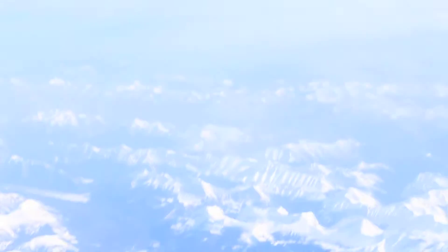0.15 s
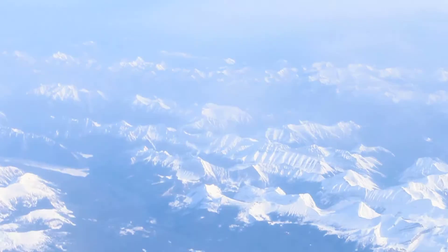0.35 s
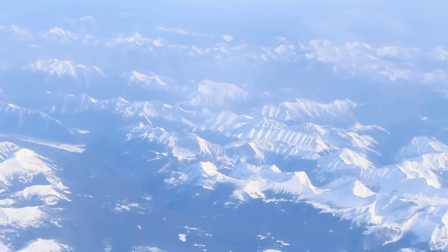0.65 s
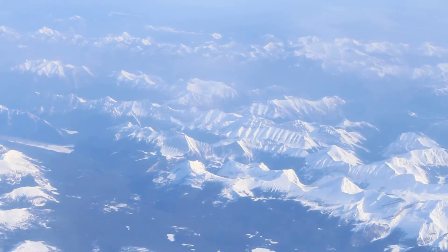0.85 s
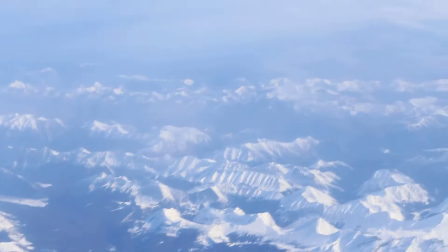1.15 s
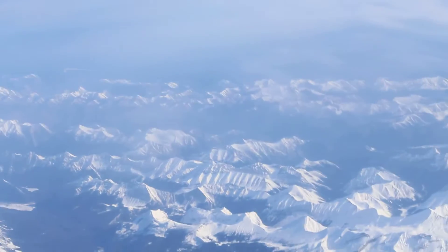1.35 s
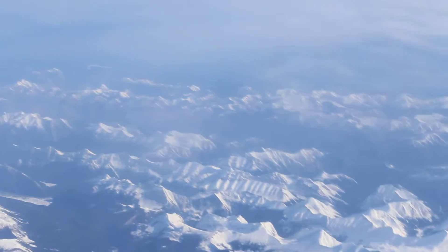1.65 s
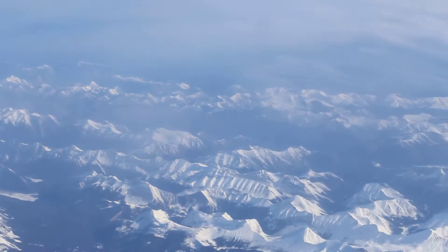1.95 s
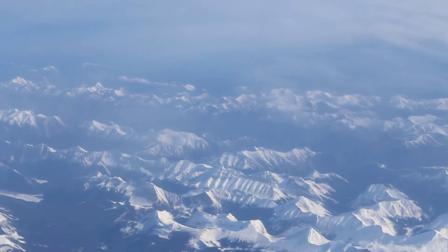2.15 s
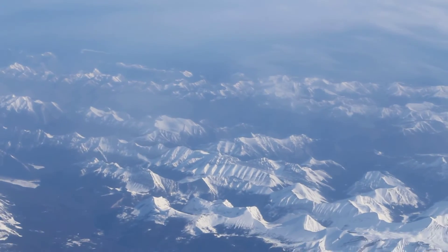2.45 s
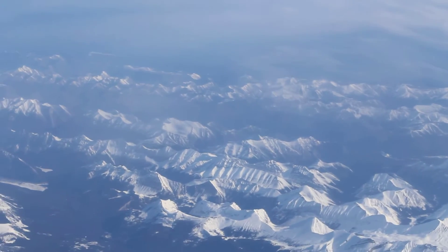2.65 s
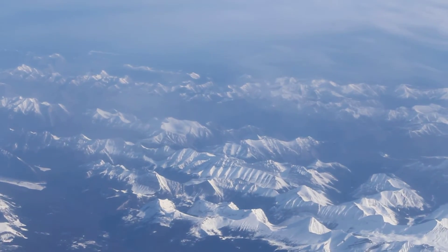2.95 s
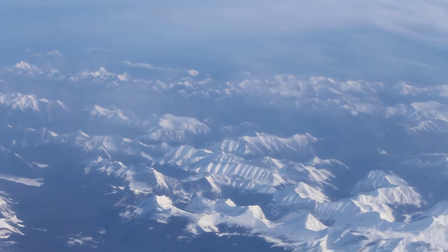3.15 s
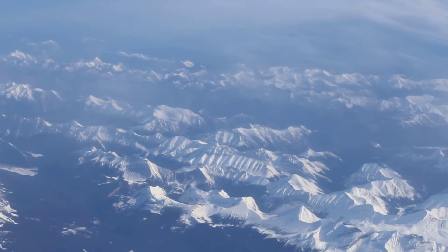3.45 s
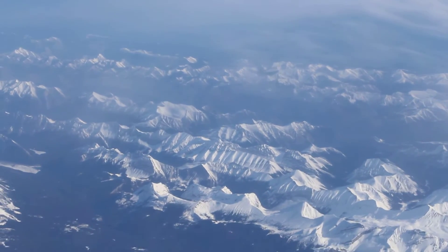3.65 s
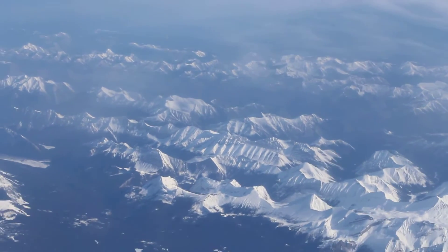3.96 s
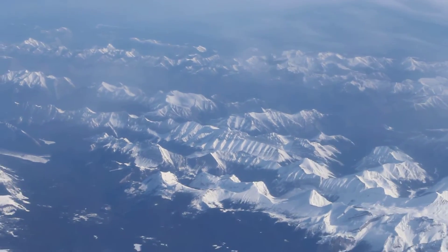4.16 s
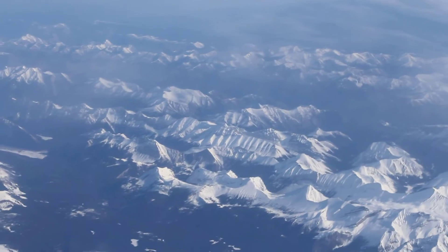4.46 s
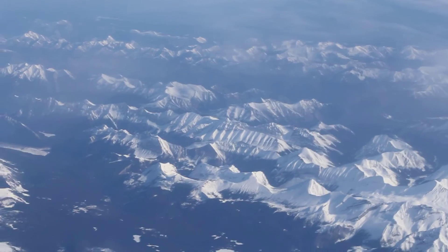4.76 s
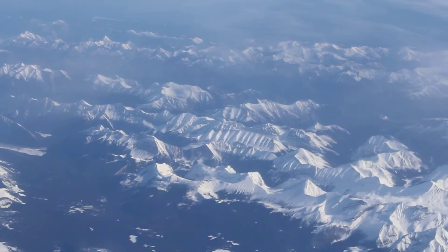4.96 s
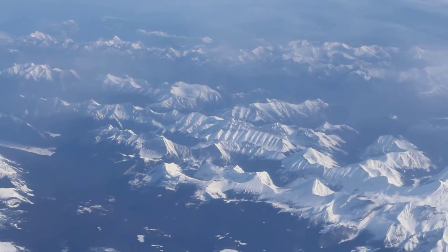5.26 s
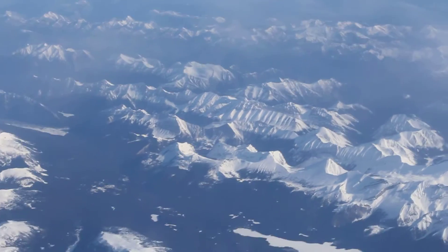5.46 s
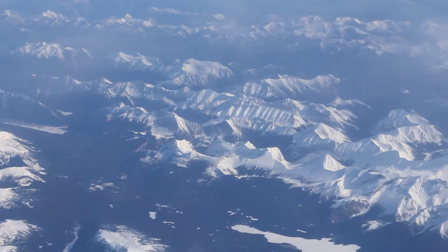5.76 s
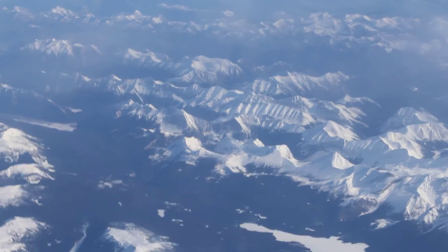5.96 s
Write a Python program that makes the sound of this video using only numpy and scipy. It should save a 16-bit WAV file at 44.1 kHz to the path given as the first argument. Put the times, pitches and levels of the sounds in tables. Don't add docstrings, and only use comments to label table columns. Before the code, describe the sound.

Broadband cabin noise, boomy and muffled by the wall panels, runs without pause from start to end. It starts a little louder, then holds nearly level with short thumping surges. Very close to the microphone, dry skin scrapes and small plastic ticks come and go, a finger briefly dulls the sound, and a double knock closes it.

```python
import sys
import numpy as np
from scipy import signal
from scipy.fft import rfft, irfft
from scipy.io import wavfile
from scipy.ndimage import uniform_filter1d

SR = 44100
rng = np.random.default_rng(int(sys.argv[2]) if len(sys.argv) > 2 else 0)


def inscribe(sig):
    pcm = np.round(np.clip(np.atleast_2d(sig).T, -1, 1) * 32767)
    wavfile.write(sys.argv[1], SR, pcm.astype(np.int16))


def ratio(d):
    e = np.asarray(d, float) / 20
    return 10 ** e


N = 268993


def evened(x):
    return x / np.sqrt(np.mean(x ** 2) + 1e-20)


def drifting(shape, span, axis=-1):
    return evened(uniform_filter1d(rng.standard_normal(shape), size=span, axis=axis))


def read(points, hz):
    f, value = np.transpose(points)
    return np.interp(np.log(hz + 1), np.log(f + 1), value)


def add(mix, s, sound):
    part = mix[round(s * SR):][:len(sound)]
    part += sound[:len(part)]


def colour(x, db_of):
    return irfft(rfft(x) * ratio(db_of(np.fft.rfftfreq(len(x), 1 / SR))), len(x))


def resonate(x, hz, width):
    turn = np.exp(2j * np.pi * np.cumsum(hz * np.ones(len(x))) / SR)
    r = np.exp(-np.pi * width / SR)
    once = signal.lfilter([1 - r], [1, -r], x / turn)
    twice = signal.lfilter([1 - r], [1, -r], once)
    return 2 * (turn * twice).real


def roar():
    # t/s, level/dB
    airflow = [(0, 2.5), (.4, 0.5), (.7, 0), (1, 1), (1.5, -0.5), (1.95, .5), (2.25, -1.5), (2.5, -0.5),
               (3.6, 0), (4.4, 0), (5.1, 0.2), (5.7, .5), (6.1, -1.5)]
    # f/Hz, level/dB
    vent_spectrum = [(1000, 17.5), (2500, -3), (3500, -0.5), (5800, -7.5), (6400, -12), (8000, -13),
                     (9000, -17.5), (12000, -19.5), (15600, -18), (16000, -13.5)]
    hz, frames = np.fft.rfftfreq(2048, 1 / SR), N // 512 + 5

    upper = 1 / (1 + (430 / (hz + 1)) ** 4)
    colours = ratio(cabin_db(hz)) * np.sqrt([1 - upper, upper])
    colours /= np.linalg.norm(colours[0])
    vent = ratio(read(vent_spectrum, hz)) / np.sqrt(1 + (2400 / (hz + 1)) ** 4)
    colours = np.vstack([colours, vent / np.linalg.norm(vent)])

    patches = rng.standard_normal((frames, len(hz))).T
    patches = uniform_filter1d(patches, size=20, axis=0)
    patches = evened(uniform_filter1d(patches, size=8, axis=1))
    a, b = rng.standard_normal((frames, len(hz), 2)).T
    field = (a + 1j * b) * ratio(1.05 * patches) * colours[:, :, None]
    boom, rush, hiss = signal.istft(field, nperseg=2048, noverlap=1536)[1][:, :N]

    t = np.arange(N) / SR
    swell_db = np.interp(t, *np.transpose(airflow))
    surge_db, sag_db = buffeting(t)
    boom_db = -16.5 + swell_db + surge_db + sag_db
    rush_db = -15.5 + 1.2 * swell_db + 0.8 * sag_db
    hiss_db = -46.5 + 1.8 * swell_db + 0.3 * surge_db + 0.4 * sag_db
    flicker_db = drifting(N, 1500)
    air = ratio(boom_db) * boom + ratio(rush_db) * rush + ratio(hiss_db + flicker_db) * hiss
    return air / np.std(boom)


def cabin_db(hz):
    # f/Hz, level/dB
    wall = [(15, -60.5), (25, -15), (102, -14.5), (144, 0.5), (185, -2), (216, -5.5), (278, -0.5),
            (441, -14.5), (578, -12.5), (674, -18), (757, -17.5), (2500, -46), (3250, -61.5), (5500, -120)]
    # f/Hz, width/Hz, lift/dB
    resonances = [(60, 8.3, -4), (95, 13, 3.5), (150.7, 45, 3.5), (247.5, 77, 2.5), (330, 58, 4),
                  (523, 67, 0.5), (573, 27, 2.5), (754, 55, 3.5), (1100, 180, 3.5), (1426, 55, 5.5)]
    lift_db = sum(db / (1 + (2 * (hz - f) / width) ** 2) for f, width, db in resonances)
    return read(wall, hz) + lift_db


def buffeting(t):
    # t/s, surge/dB, sag/dB
    gusts = [
        (0.002, 6, -3.5),
        (0.17, 1, -4.5),
        (1.381, 7.5, 2),
        (1.63, 13, -5),
        (4.47, 3, -1),
        (4.569, 10, -2),
        (4.885, 9.5, -4),
    ]
    s, surge_db, sag_db = np.transpose(gusts)[:, :, None]
    surge = surge_db * np.exp(-((t - s) / 0.013) ** 2)
    sag = sag_db * np.exp(-((t - s - 0.045) / 0.051) ** 2)
    return surge.sum(0), sag.sum(0)


def hand():
    # start t/s, length/s, peak level/dB, place of peak (0-1), top of the hiss level/dB
    swipes = [(.87, 0.27, -35.5, 0.22, -18), (1.887, 0.18, -33, 0.17, -17), (4.936, 0.26, -35.5, .5, -22),
              (5.185, .05, -41, 0.3, -28), (5.86, 0.2, -44, 0.4, -11)]
    drags = [(1.2, .25, -33.5, 0.96, -16.5), (1.435, .28, -37.5, .2, -12), (1.7, 0.14, -36.5, 1, -15.5),
             (5.255, .21, -43.5, .25, -22), (5.439, 0.18, -37.5, 0.4, -24), (5.6, 0.26, -41.5, .25, -21)]
    # t/s, peak level/dB, ring f/Hz, hiss length/s, tilt/dB per octave
    ticks = [(1.413, -28.5, 3460, .014, -4), (3.660, -20, 3040, 0.0077, -10), (3.885, -43, 4670, .009, -2),
             (3.886, -39, 6100, .006, 1), (4.102, -46, 8600, .004, 2), (6.06, -19.5, 3080, 0.0043, -1),
             (6.084, -19.5, 3170, 0.0086, -9.5)]
    # t/s, peak level/dB, hiss length/s, tilt/dB per octave
    cracks = [(0.976, -26.5, .011, -6), (1.58, -37, .01, 2), (2.708, -47, 0.053, -1.5),
              (3.674, -37, .0052, -3), (4.352, -46, .044, 1), (5.247, -28, .0074, -3),
              (6.063, -22, 0.0051, -1.5), (6.066, -19.5, 0.012, -14)]
    # t/s, peak level/dB, f/Hz, length/s
    knocks = [
        (6.056, -4.5, 330, 0.015),
        (6.085, -11, 413, 0.0087),
    ]
    # t/s, length/s, from f/Hz, to f/Hz, level/dB
    squeaks = [
        (3.226, .09, 7200, 7800, -53),
        (3.855, .022, 13700, 13350, -44),
        (3.876, 0.021, 10680, 10680, -47),
        (3.895, .02, 10680, 10680, -62),
    ]
    out = np.zeros(N)
    for row in swipes:
        add(out, row[0], stroke(*row, ring=0.15, rise_db=10.5, fall_db=12.5))
    for row in drags:
        add(out, row[0], stroke(*row, ring=0.72, rise_db=3, fall_db=4))
    for s, peak_db, hz, length, tilt_db in ticks:
        add(out, s, tick(peak_db, hz, length, 0.28, tilt_db))
    for s, peak_db, length, tilt_db in cracks:
        add(out, s, tick(peak_db, 0, length, 0, tilt_db))
    for s, *rest in knocks:
        add(out, s, knock(*rest))
    for s, length, *rest in squeaks:
        add(out, s, squeak(length, *rest, waver=4 * length ** 2))
    return out


def stroke(start, length, peak_db, place, top_db, ring, rise_db, fall_db):
    # f/Hz, level/dB
    rub_low = [(700, -7), (1500, 6), (3000, -4.5), (5500, -2.5), (7500, -19), (10000, -25)]
    rub_top = [(5500, -18), (7500, 2), (10000, -7), (12500, -5), (14500, -13), (16000, -12)]
    # f/Hz, width/Hz, level/dB
    first_hold = [(1290, 400, 4), (2230, 170, -3), (3210, 270, -4), (3610, 380, 1), (4370, 120, -10),
                  (4810, 160, -4), (5530, 250, -17)]
    finger_moved = [(1300, 440, 5.5), (2150, 250, -1.5), (3400, 340, -7), (3850, 190, 1), (4390, 200, -6),
                    (4910, 200, -5), (5600, 210, -18), (6500, 400, -13)]
    late_hold = [(2570, 300, -12), (3250, 400, -8), (3780, 340, 0), (4480, 260, -5), (5000, 400, -12),
                 (5550, 600, -10)]
    # f/Hz, width/Hz, level/dB
    air_gap = [(7250, 800, -1), (8100, 500, -8), (9100, 500, -7), (10900, 700, -9), (12200, 1200, 0),
               (13400, 1500, 0), (14400, 1200, -2), (15400, 700, -5)]
    moved_s, regrip_s = 1.43, 3
    casing = first_hold if start < moved_s else finger_moved if start < regrip_s else late_hold
    sliding_from_s = 1.17 if start < regrip_s else 5.17

    t = np.arange(0, length, 1 / SR)
    press_db = np.interp(t / length, [0, np.clip(place, .01, .99), 1], [-rise_db, 0, -fall_db])
    slid = np.maximum(t + start - sliding_from_s, 0)
    tilt_db = -7.5 + 15 * np.sin(np.pi * np.minimum(slid / 0.7, 1))
    narrowing = 1 + 0.075 * slid

    catches = (rng.random(len(t)) < 90 / SR) * np.minimum(rng.exponential(1, len(t)), 2)
    slips = signal.lfilter([1], [1, -np.exp(-1 / (0.004 * SR))], catches)
    hiss = rng.standard_normal(len(t)) * ratio(1.6 * slips)
    dry_low = evened(colour(hiss, lambda f: read(rub_low, f)))
    dry_top = evened(colour(hiss, lambda f: read(rub_top, f)))
    dry_share, ring_share = np.sqrt(1 - ring), np.sqrt(ring)
    low = dry_share * dry_low + ring_share * rung(hiss, casing, 0.96)
    top = dry_share * dry_top + ring_share * rung(hiss, air_gap, narrowing, tilt_db)

    touch = np.clip(np.minimum(t, length - t) / 0.0068, 0, 1)
    return touch * ratio(peak_db) * (ratio(press_db) * low + ratio(top_db + 0.97 * press_db) * top)


def rung(x, modes, stretch, tilt_db=0):
    damping_db = 2.2 * drifting((len(x), len(modes)), 3500, axis=0).T
    out = np.zeros(len(x))
    for k, (f, width, db) in enumerate(modes):
        gain = ratio(db + damping_db[k] + tilt_db * np.log2(f / 10000))
        out += (-1) ** k * gain * evened(resonate(x, f * stretch, width))
    return evened(out)


def tick(peak_db, hz, length, ring, tilt_db):
    # f/Hz, level/dB
    crack_spectrum = [(500, -23), (1200, 9.5), (2500, 6.5), (5000, 6), (9000, -5), (16000, -6)]
    t = np.arange(3000) / SR
    rise, fall = np.minimum(t / 0.00052, 1), np.exp(-(t / length) ** 2)
    tail = ratio(-14) * np.exp(-t / 0.046)
    crack = rng.standard_normal(len(t))
    hiss = evened(colour(crack, lambda f: read(crack_spectrum, f) + tilt_db * np.log2((f + 300) / 3000)))
    dry_part = np.sqrt(1 - ring) * hiss * (fall + tail)
    ringing = np.sqrt(ring) * evened(resonate(crack, hz, 300)) * fall
    return ratio(peak_db - 3) * rise * (dry_part + ringing)


def knock(db, hz, length):
    t = np.arange(2000) / SR
    return -ratio(db) * np.sin(2 * np.pi * hz * t) * np.minimum(t / .002, 1) * np.exp(-(t / length) ** 2)


def squeak(length, from_hz, to_hz, db, waver):
    count = round(length * SR)
    wavering = 1 + waver * drifting(4000, 60)[:count]
    hz = np.linspace(from_hz, to_hz, count) * wavering
    return ratio(db) * np.sqrt(2) * np.sin(2 * np.pi * np.cumsum(hz) / SR) * np.hanning(count)


def hum():
    drift_hz = 0.6 * drifting(N, 20000)
    level_db = -47 + 1.5 * drifting(N, 20000)
    return ratio(level_db) * np.sqrt(2) * np.sin(2 * np.pi * np.cumsum(49.2 + drift_hz) / SR)


def scene():
    return (roar() + hand() + hum())[None]


def covered(sound):
    # t/s, loss/dB
    finger = [
        (1.829, 0),
        (1.832, 16),
        (1.858, 17),
        (1.866, 8),
        (1.89, 5),
        (1.897, 0),
    ]
    # f/Hz, share
    loss_share = [(300, 0.28), (1000, 0.69), (2500, 0.32), (4000, 0.031), (6500, 0.84), (13000, 1.3)]
    hz, t, z = signal.stft(sound, SR, nperseg=256, noverlap=192)
    loss_db = np.interp(t, *np.transpose(finger)) * read(loss_share, hz)[:, None]
    loss_db = loss_db + 9 * np.exp(-((t - 2.7) / 0.0097) ** 2)
    return signal.istft(z * ratio(-loss_db), SR, nperseg=256, noverlap=192)[1][:, :N]


def band_limit(x):
    return signal.sosfilt(signal.butter(12, 16300, fs=SR, output="sos"), x)


def record(dry):
    heard = covered(dry)
    ceiling = 1.05
    edge = signal.firwin(1023, 15730, window=("kaiser", 9), fs=SR)
    heard = signal.oaconvolve(ceiling * np.tanh(heard / ceiling), edge[None], "same")
    bass_cut = signal.butter(4, 36, "high", fs=SR, output="sos")
    heard = signal.sosfilt(bass_cut, heard)
    heard *= np.minimum(np.arange(N) / 60, 1)
    return band_limit(heard)


dry = scene()
out = record(dry)
inscribe(out)
```